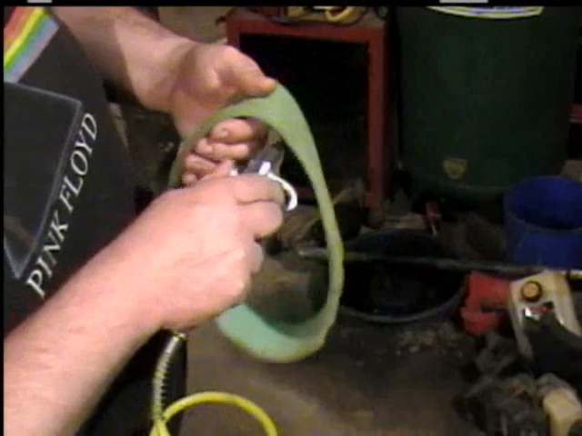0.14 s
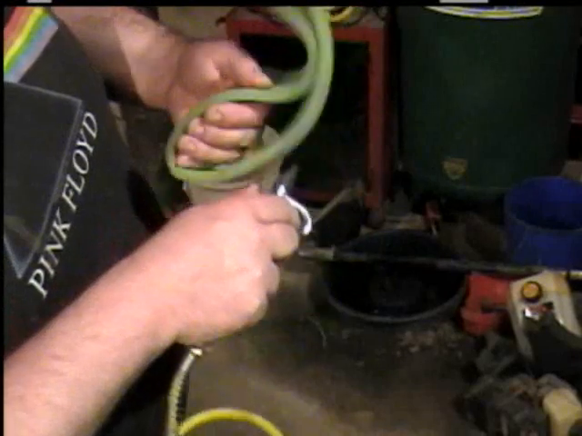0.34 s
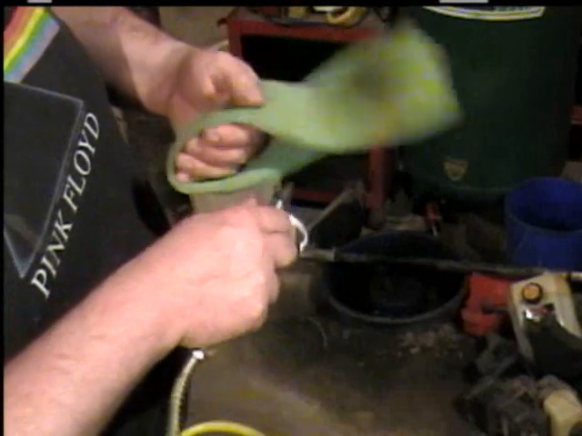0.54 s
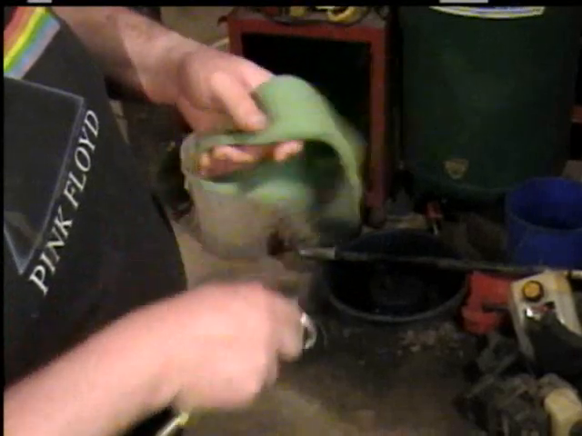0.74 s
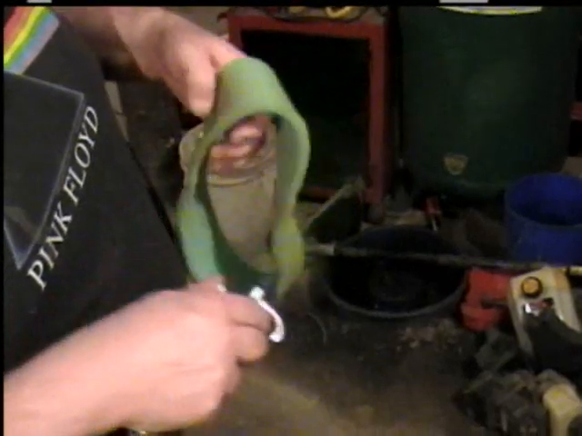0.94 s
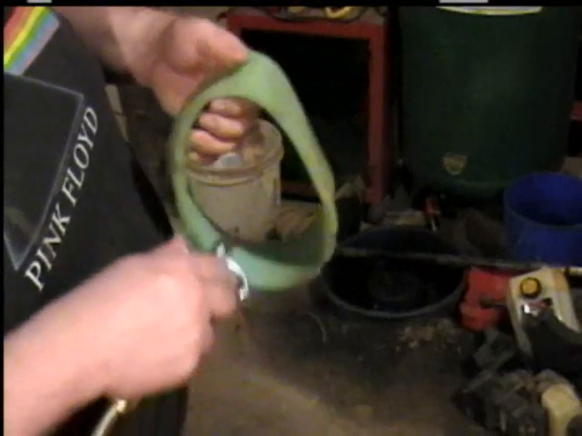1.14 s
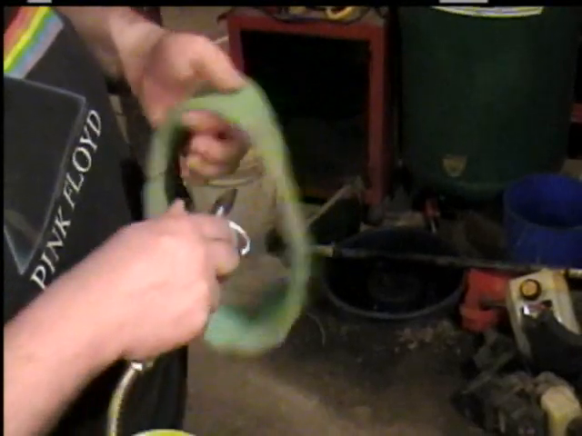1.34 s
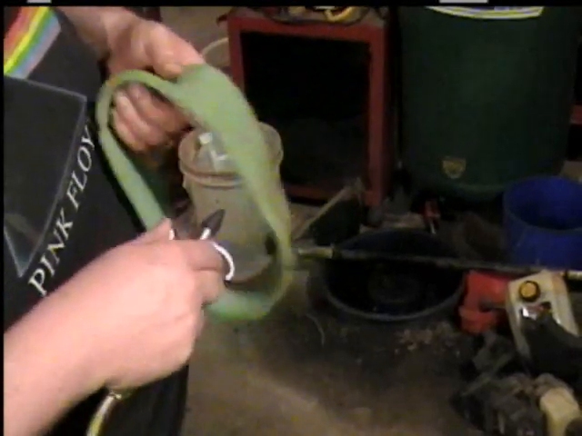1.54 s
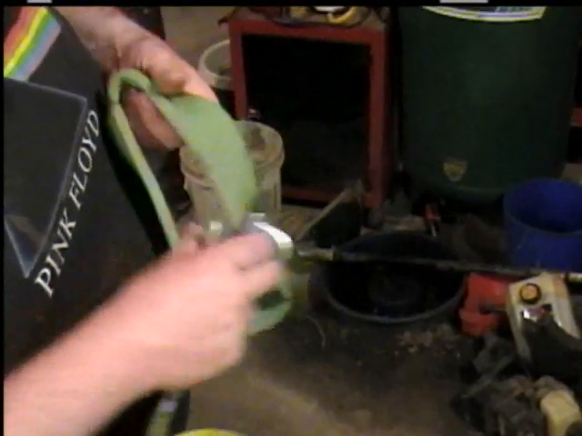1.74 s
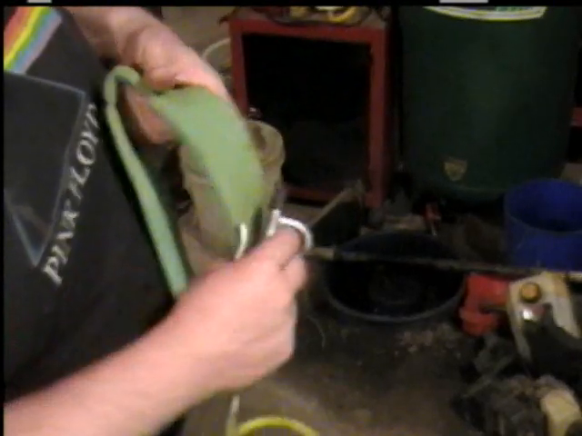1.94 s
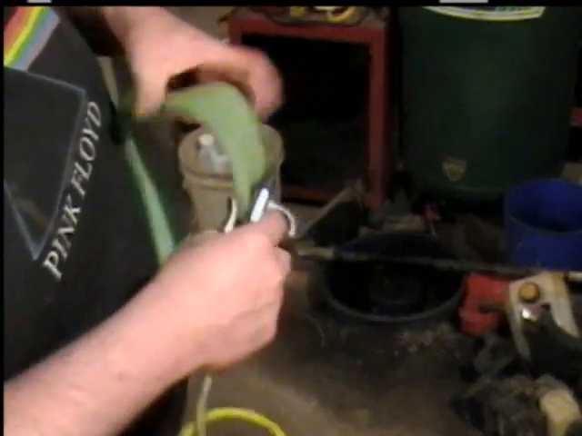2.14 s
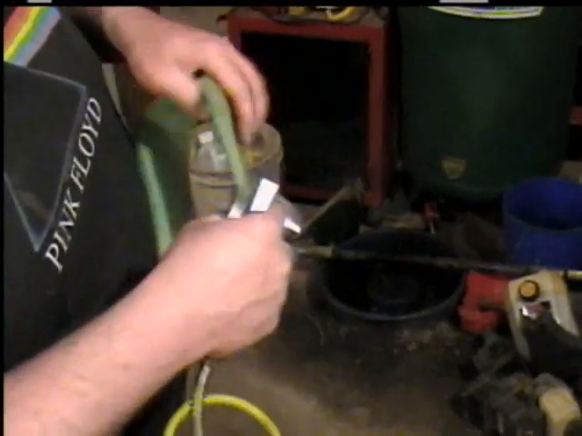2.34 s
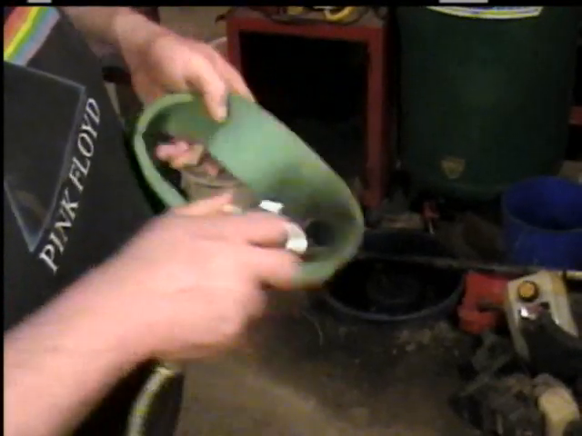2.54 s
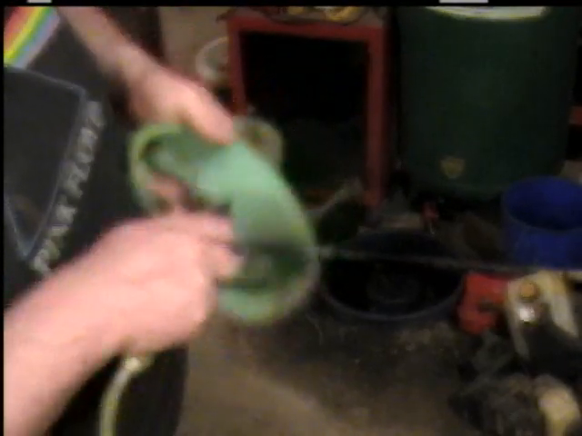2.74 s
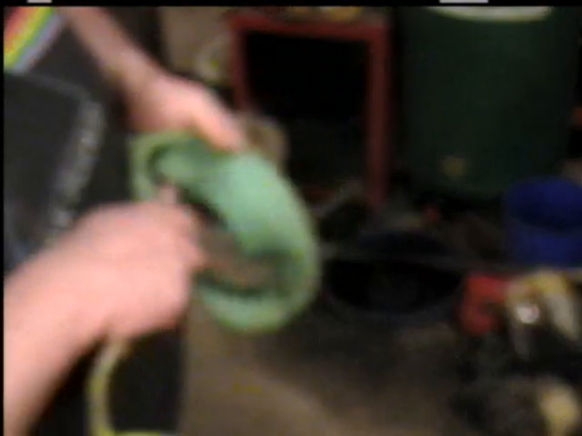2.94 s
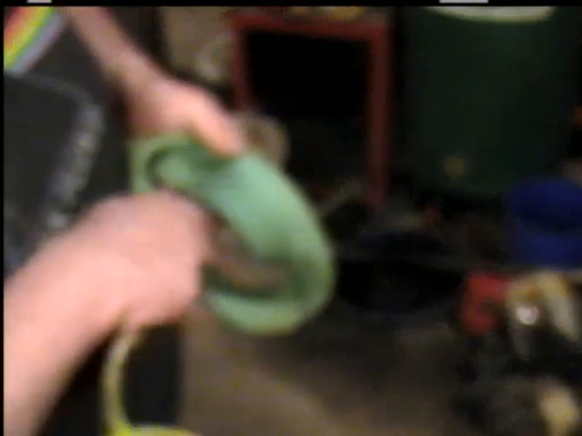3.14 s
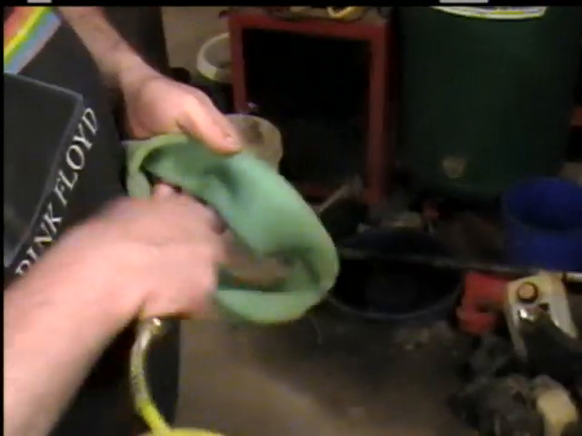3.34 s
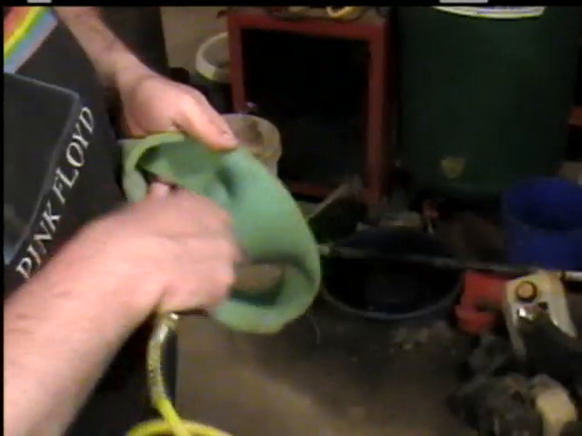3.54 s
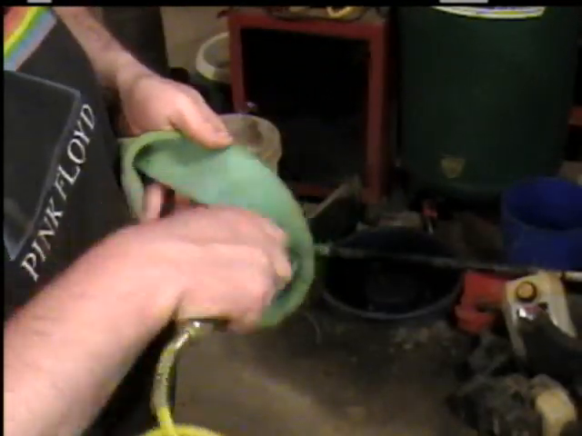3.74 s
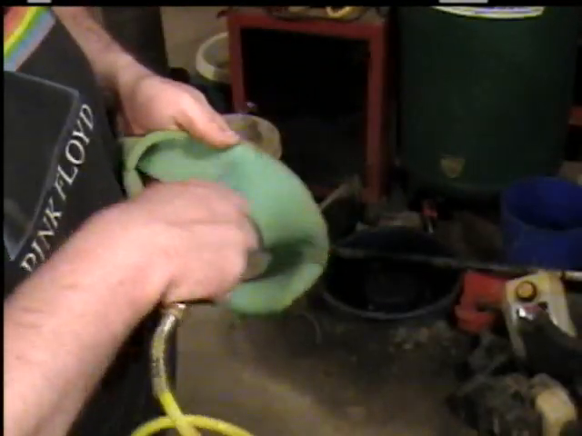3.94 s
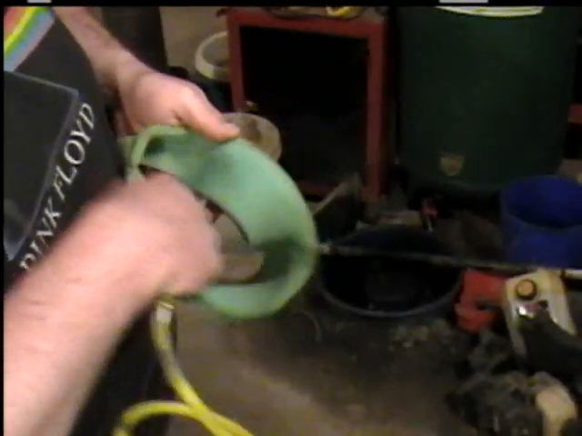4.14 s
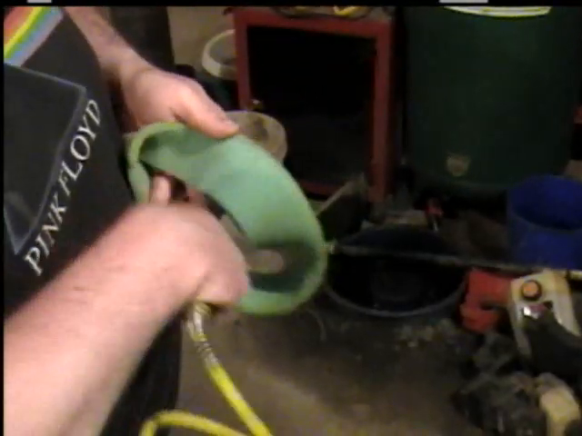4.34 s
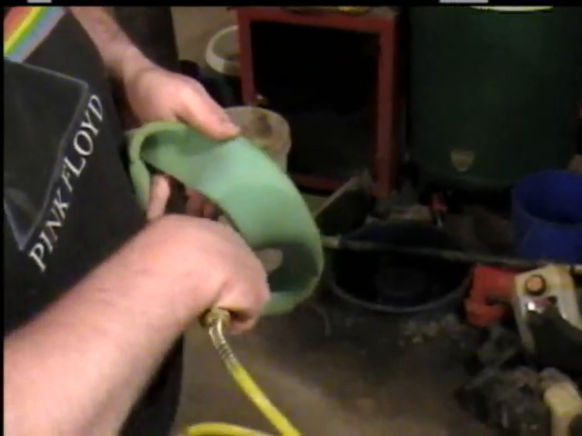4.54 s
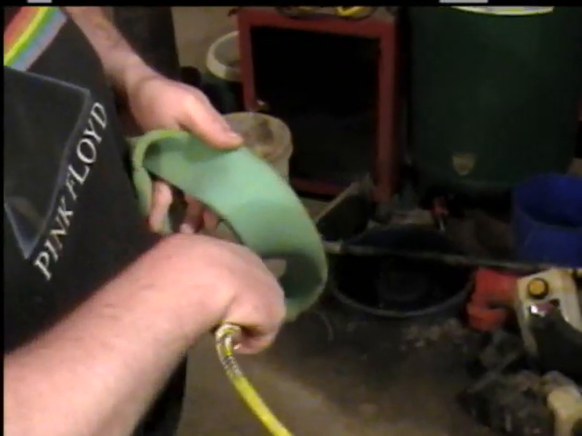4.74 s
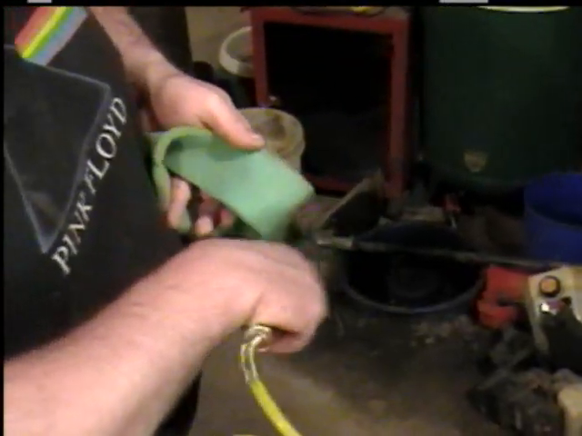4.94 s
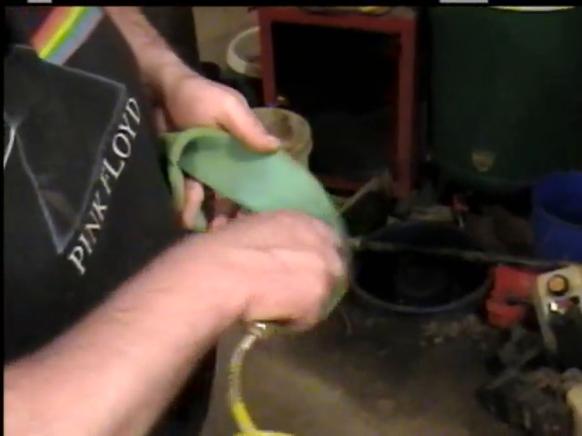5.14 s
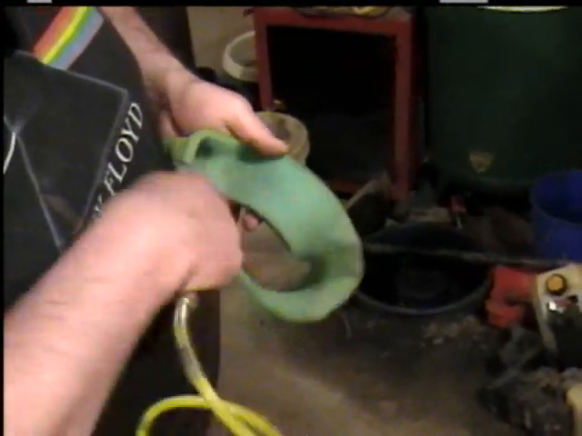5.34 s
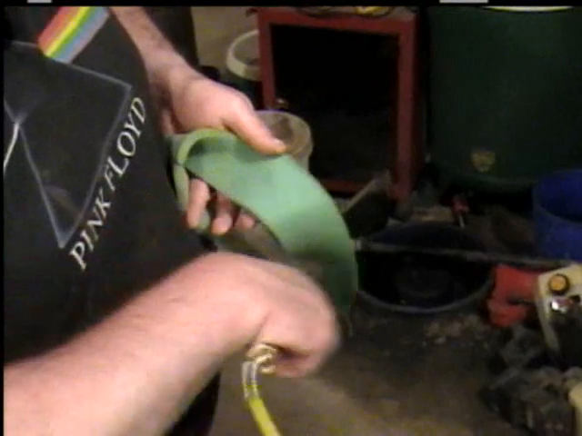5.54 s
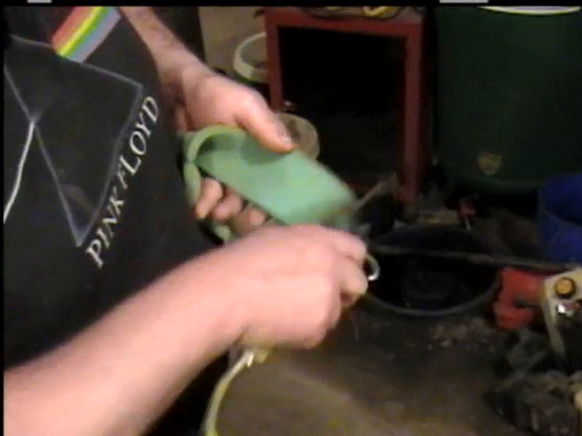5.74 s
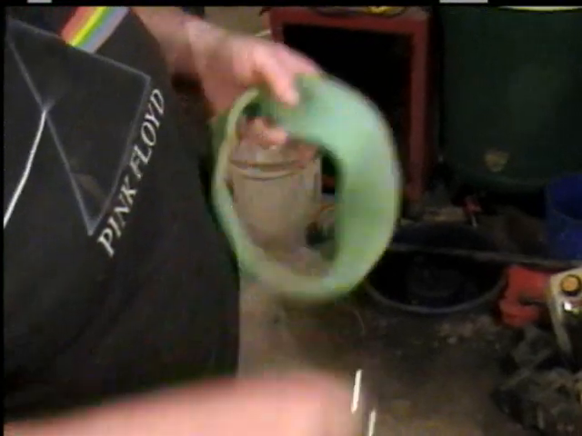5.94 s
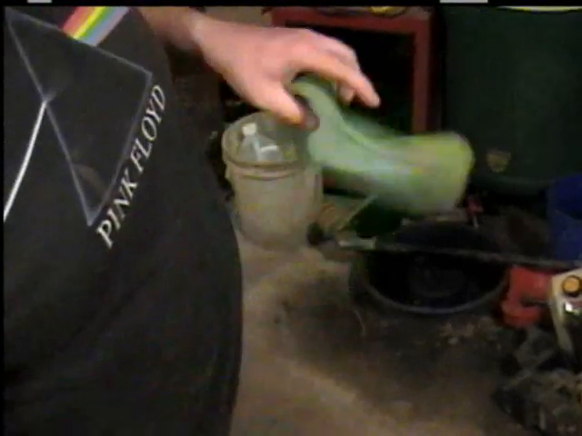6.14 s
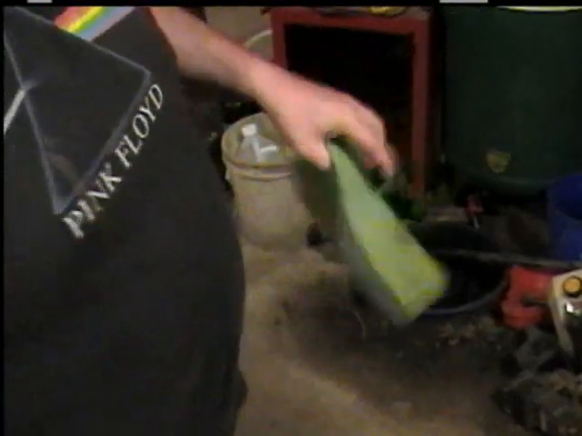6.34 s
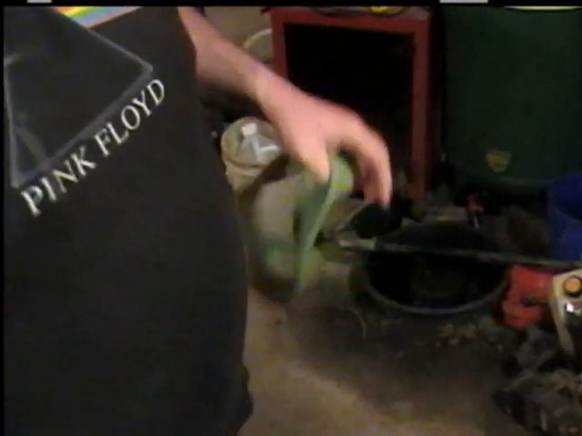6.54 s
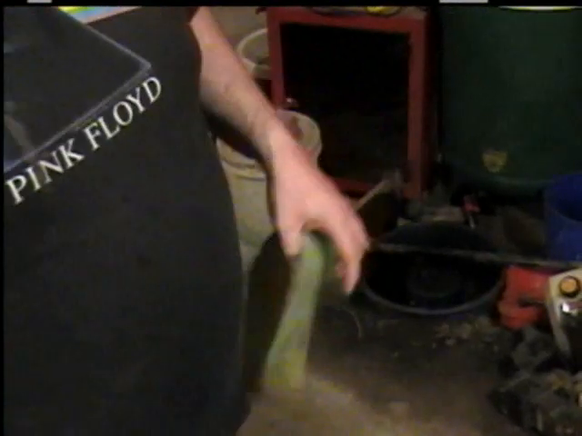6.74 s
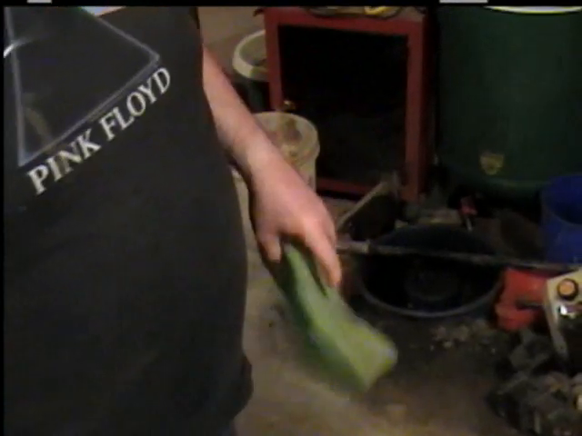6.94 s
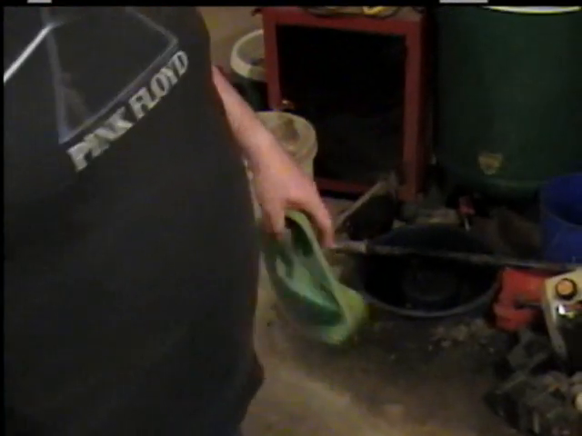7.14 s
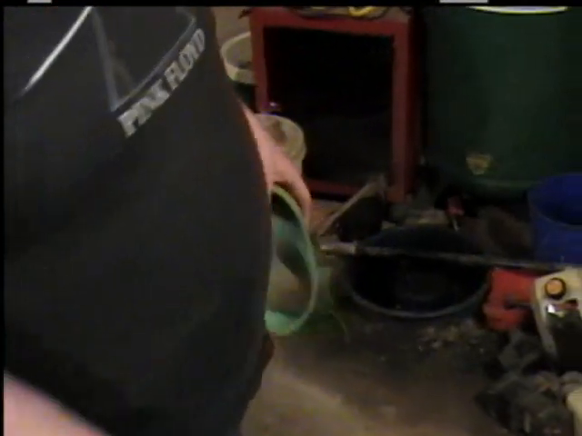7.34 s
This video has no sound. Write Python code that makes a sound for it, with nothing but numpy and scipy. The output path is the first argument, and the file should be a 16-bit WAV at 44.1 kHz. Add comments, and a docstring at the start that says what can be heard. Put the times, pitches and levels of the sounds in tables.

```python
"""Air blow gun drying a foam filter

In a small workshop a blow gun gives one short burst, then a long blast swept over wet foam. All air sounds are shaped noise.
The free jet hisses; where it bites the foam rasps, the cupped ring sounds hollow, and the loose band flutters and sputters.
Around the blasts the trigger leaks through ringing nozzle resonances and hands make short resonant bumps.
A tape camcorder close by adds steady hiss and drifting sine tones, and combs the sound at its head drum's rate."""
import sys
import numpy as np
from scipy import signal
from scipy.fft import rfft, irfft, next_fast_len
from scipy.io import wavfile
from scipy.ndimage import uniform_filter1d, map_coordinates

SR = 44100
rng = np.random.default_rng(int(sys.argv[2]) if len(sys.argv) > 2 else 0)


def wav_record(signal):
    """Record a signal, one row per channel, as 16-bit PCM in the file named by sys.argv[1]."""
    frames = np.transpose(np.atleast_2d(signal))
    bounded = np.clip(frames, -1, 1)
    # unit amplitude maps onto the largest positive 16-bit level
    quanta = np.round(bounded * 32767).astype(np.int16)
    wavfile.write(sys.argv[1], SR, quanta)


N = 325899

# left-right likeness of the air noise: freq_hz, correlation
AIR_LIKENESS = [(60, 0.22), (130, 0.64), (290, 0.31), (630, 1), (1380, 0.75), (3000, .9), (6600, 0.98),
                (11000, 0.67), (14600, 0.52)]
# the jet bites into the foam: start_s, length_s, more_rasp_db, more_hollow_db, mic_wind_db (relative)
FOAM_BITES = [(0.246, 0.051, 5, 3.5, -50), (0.607, 0.036, 3.5, 1.5, -65), (2.916, 0.043, 7, 9.5, -44),
              (2.959, 0.098, 4.5, 3.5, -56), (3.133, 0.18, 3.5, 2.5, -56), (3.38, 0.033, 3, 3.5, -53),
              (3.424, 0.095, 2.5, 6.5, -61), (3.612, 0.11, 3.5, 4.5, -62), (3.898, 0.073, 4.5, 2.5, -50),
              (4.065, 0.059, 4.5, 5, -50), (4.157, 0.11, 2.5, 2.5, -70), (4.275, .083, 3.5, 5.5, -70),
              (4.876, 0.077, 1, 3, -59), (5.138, 0.037, 3, 5, -64), (5.29, 0.12, 4, 5.5, -57),
              (5.433, 0.058, 2.5, 3, -54)]


def amp(db):
    """Decibels to gain."""
    return 10 ** (np.asarray(db) / 20)


def unit(x):
    """x at rms 1."""
    return x / np.sqrt(np.mean(x ** 2) + 1e-20)


def along(points, hz):
    """(Hz, value) points interpolated on a log frequency axis."""
    f, v = np.transpose(points)
    return np.interp(np.log(hz + 1), np.log(f + 1), v)


def wobble(rate_hz):
    """Smooth random curve through rate_hz normal knots a second."""
    knots = rng.standard_normal(int(N * rate_hz / SR) + 4)
    return map_coordinates(knots, [np.arange(N) * rate_hz / SR])


def filtered(x, response):
    """x times a complex response of frequency."""
    m = next_fast_len(N + SR // 2)
    spectrum = rfft(x, m) * response(np.fft.rfftfreq(m, 1 / SR))
    return irfft(spectrum, m)[..., :N]


def resonance(f, hz, width_hz):
    """Response of one damped resonance, 1 at its centre."""
    return 1j * f * width_hz / (hz * hz - f * f + 1j * f * width_hz)


def swell(start_s, length_s):
    """Quick rise to 1 at half the length, then a slower fall."""
    u = np.maximum(np.arange(N) / SR - start_s, 0) / (length_s / 2)
    return u * u * np.exp(2 - 2 * u)


def stroke(start_s, length_s, rise_s, fall_s):
    """Soft-edged gate, half open at its start and end."""
    t = np.arange(N) / SR - start_s
    opening = (1 + np.tanh(t / (2 * rise_s))) / 2
    closing = (1 + np.tanh((length_s - t) / (2 * fall_s))) / 2
    return opening * closing


def moves(rows):
    """Sum of (start_s, length_s, size) movements of the jet over the foam."""
    hand_s = 0.0066  # how quickly the moving jet takes hold and lets go
    return sum(size * stroke(start_s, length_s, hand_s, hand_s) for start_s, length_s, size in rows)


def rush(spectrum, alike, patchy_db):
    """Stereo noise of rms 1 with patches of random gain in time and frequency."""
    z = signal.stft(rng.standard_normal((2, N)), nperseg=512)[2]
    field = uniform_filter1d(rng.standard_normal(z.shape[1:]), size=4, axis=0)
    field = uniform_filter1d(field, size=16, axis=1)
    pair = signal.istft(z * amp(patchy_db * unit(field)), nperseg=512)[1][:, :N]

    def mid_side(hz):
        # this angle splits the power so that left and right correlate as the table says
        angle = np.arccos(np.clip(along(alike, hz), -1, 1)) / 2
        return amp(along(spectrum, hz)) * [np.cos(angle), np.sin(angle)]

    mid, side = filtered(pair, mid_side)
    return unit(np.array([mid + side, mid - side]))


def sputter(depth_db, rate_hz):
    """Uneven gain of mean power 1: water and foam break up the stream."""
    return unit(amp(depth_db * wobble(rate_hz)))


def background():
    """Steady hiss and the tape drive, whose close tones drift together and beat against each other."""
    # hiss spectrum: freq_hz, density_db_per_hz (relative)
    floor = [(20, -15), (55, -11), (120, -1), (220, -2), (330, -3), (480, -1), (700, -4.5), (1100, -6.5),
             (1700, -11), (2700, -7), (5000, -7.5), (9500, -7.5), (12000, -14), (15000, -31)]
    # hiss left-right likeness: freq_hz, correlation
    floor_likeness = [(60, 0.24), (240, 0.33), (930, 0.4), (3690, 0.97), (14600, 0.92)]
    # tape drive tones: freq_hz, rms_db (relative)
    tones = [(59.2, -83), (118.4, -69), (218, -69.5), (344.5, -79), (468, -64.5), (577, -65.5), (617, -69),
             (786, -62), (955, -76), (1070, -64.5), (1104.4, -59), (1123.5, -62.5), (1157.6, -63),
             (1421, -70.5), (1588, -82), (4710, -69), (9798, -66)]
    t = np.arange(N) / SR + 5e-5 * wobble(7.1)  # the drive runs slightly early and late
    whine = np.zeros(N)
    for hz, db in tones:
        whine += amp(db) * np.sqrt(2) * np.sin(2 * np.pi * (hz * t + rng.random()))
    hiss = amp(-47.0) * rush(floor, floor_likeness, patchy_db=1.7)
    return hiss + amp(-2.7) * whine


def handling():
    """Each soft contact is a short swell of noise in one broad resonance."""
    # hands, foam and gun brush and bump: start_s, level_db, centre_hz, width_hz, length_s
    contacts = [(1.098, -62, 500, 400, 0.055), (1.645, -53, 338, 70, 0.12), (1.975, -49.5, 453, 300, 0.022),
                (2.028, -52, 487, 200, 0.046), (2.19, -52, 580, 120, 0.052), (2.52, -58, 2000, 600, .03),
                (2.597, -48, 7700, 1100, 0.026), (2.67, -56, 480, 100, .07), (2.872, -45, 1400, 300, .035),
                (5.858, -44, 402, 200, 0.028), (6.066, -49, 530, 200, 0.06), (6.062, -53, 1400, 1210, 0.05),
                (6.598, -55, 240, 120, 0.05), (6.935, -47.5, 355, 141, 0.14),
                (7.23, -54.5, 2010, 450, 0.21), (7.32, -60, 390, 120, .08)]
    out = np.zeros(N)
    for start_s, db, hz, width_hz, length_s in contacts:
        rub = filtered(rng.standard_normal(N), lambda f: resonance(f, hz, width_hz) ** 2)
        out += amp(db) * swell(start_s, length_s) * unit(rub)
    return out


def leak():
    """A thread of air past the half-pressed trigger sings faintly in the nozzle's resonances."""
    # nozzle resonances: freq_hz, width_hz, gain_db
    nozzle = [(2600, 1100, -2.5), (3910, 140, 6.5), (5140, 1200, -6)]
    # air seeping past the trigger: start_s, length_s, level_db, fade_s
    leaks = [(0.8, 0.45, -47.5, .06), (1.645, 0.37, -50.5, .03), (2.887, 0.062, -38, .005),
             (5.78, 0.46, -49, 0.14)]
    seep_rise_s = 0.0099

    def ringing(f):
        # neighbouring resonances have opposite signs
        return sum((-1) ** k * amp(db) * resonance(f, hz, width_hz)
                   for k, (hz, width_hz, db) in enumerate(nozzle))

    air = unit(filtered(rng.standard_normal(N), ringing))
    seep = sum(amp(db) * stroke(start_s, length_s, seep_rise_s, fade_s)
               for start_s, length_s, db, fade_s in leaks)
    return air * seep


def puffs():
    """First slug of each blast, then air thrown back by each bite, thud low at the microphone ports."""
    # first slug from the opening valve: start_s, level_db, time_constant_s
    slugs = [(0.226, -41.5, 0.0023), (2.932, -23.5, 0.001)]
    # wind spectrum: freq_hz, density_db_per_hz (relative)
    buffet = [(15, 8), (40, 5), (100, -4.5), (180, -5), (260, -30), (500, -34)]
    slug = np.zeros(N)
    for start_s, db, tau_s in slugs:
        u = np.maximum(np.arange(N) / SR - start_s, 0) / tau_s
        slug += amp(db) * 2 * u * (2 - u) * np.exp(-u)  # a push, then a weaker suck
    stray = moves((start_s, length_s, amp(wind_db)) for start_s, length_s, _, _, wind_db in FOAM_BITES)
    wind = rush(buffet, AIR_LIKENESS, patchy_db=2.0) * sputter(depth_db=2.5, rate_hz=30)
    return slug + amp(5.0) * stray * wind


def airflow():
    """The valve cracks with a spit and opens, the flow holds, and after release the pressure drains away."""
    # trigger: press_s, release_s, valve_opening_s, spit_share (flow at once), drain_db_per_s
    blasts = [(0.222, 0.655, 0.017, 0.4, 138), (2.922, 5.671, .01, .1, 170)]
    t = np.arange(N) / SR
    flow = np.zeros(N)
    for press_s, release_s, opening_s, spit, drain_db_per_s in blasts:
        opening = np.clip((t - press_s) / opening_s, 0, 1) ** 2
        valve = (t > press_s) * (spit + (1 - spit) * opening)
        flow += valve * amp(-drain_db_per_s * np.maximum(t - release_s, 0))
    return flow


def drives():
    """Gains of jet, rasp, hollow and flutter: the airflow, shared out by where the nozzle points."""
    # slow drift of the aim, deep in the ring, then along its rim: time_s, free_jet_db, more_flutter_db
    aim = [(0.3, -19, 2), (0.43, -16.5, -1), (0.7, -17.5, 4.5), (2.97, -22, 0.5), (3.17, -24.5, 0.5),
           (3.3, -21.5, -10), (3.55, -20, -9.5), (3.95, -22.5, -2), (4.2, -19, -7.5), (4.38, -23, 3),
           (4.52, -18, 7.5), (4.8, -16.5, 5.5), (4.98, -19, 4), (5.08, -17, -2.5), (5.26, -17, 0.5),
           (5.42, -20.5, 1), (5.58, -21, 4.5), (5.68, -16.5, -0.5)]
    # the jet crosses a foam edge and the hiss flares: start_s, length_s, more_hiss_db
    edges = [(0.23, .025, 8.5), (2.922, 0.031, 6), (3.08, 0.093, 6.5), (3.364, 0.04, 7),
             (3.592, 0.026, 7.5), (3.835, .095, 6), (4.07, 0.1, 1.5)]
    # the nozzle sinks into the foam and is muffled: start_s, length_s, loss_db
    smothers = [(3.305, 0.049, 8), (3.545, .042, 8), (3.738, 0.08, 4), (4.0, 0.033, 1), (4.388, 0.097, 5.5),
                (5.502, 0.075, 5)]
    # the loose band flaps in the stream: start_s, length_s, more_flutter_db
    flap_bursts = [(0.268, 0.068, 8.5), (3.832, 0.033, 7), (4.015, 0.072, 8), (4.25, 0.058, 11),
                   (4.338, 0.072, 8), (4.868, 0.095, 8.5), (5.29, 0.046, 7.5), (5.448, 0.046, 12.5),
                   (5.578, 0.05, 12)]
    # the jet slips past, leaving mostly hiss: start_s, length_s, rasp_and_hollow_loss_db
    misses = [(5.2, 0.079, 1), (5.632, 0.15, 3)]
    rasp_db, cup_db, flutter_db = -17, -27, -40  # the foam's layers under a resting jet
    # how much of the muffling reaches each other layer
    jet_muffle_share, hollow_muffle_share, flutter_muffle_share = 0.42, 0.71, 0.3
    flap_hollow_share = 0.4  # flutter also drives the hollow of the ring
    hollow_flow_power = 1.18  # the hollow needs the most pressure: it comes last and dies first

    time_s, *columns = np.transpose(aim)
    aim_jet_db, loose_db = (np.interp(np.arange(N) / SR, time_s, column) for column in columns)
    flow = airflow()
    muffle = moves(smothers)
    miss = moves(misses)
    flaps = loose_db + moves(flap_bursts)
    bite = moves((start_s, length_s, rasp) for start_s, length_s, rasp, _, _ in FOAM_BITES)
    boom = moves((start_s, length_s, cup) for start_s, length_s, _, cup, _ in FOAM_BITES)

    jet = flow * amp(aim_jet_db + moves(edges) - jet_muffle_share * muffle)
    foam = flow * amp(rasp_db + bite - muffle - miss)
    hollow_db = cup_db + boom + flap_hollow_share * flaps - hollow_muffle_share * muffle - miss
    hollow = flow ** hollow_flow_power * amp(hollow_db)
    flutter = flow * amp(flutter_db + flaps - flutter_muffle_share * muffle)
    return jet, foam, hollow, flutter


def blow_gun():
    """Jet noise, plus the rasp, hollow and flutter of the foam that it hits."""
    # noise spectra, each: freq_hz, density_db_per_hz (relative)
    jet_spectrum = [(500, -51), (2000, -8), (4000, -4.5), (6000, -0.5), (7500, 1), (8500, -1), (9700, -1),
                    (10500, -2), (11300, -3.5), (12200, -7), (13200, -10), (14200, -53), (15200, -57)]
    foam_spectrum = [(900, -38.5), (2200, -16), (2750, -1), (3200, -1), (3800, 0), (4450, -0.5), (5200, -2),
                     (6300, -4.5), (8000, -39), (13000, -55)]
    # the dent that the jet presses into the foam, same columns
    bite_spectrum = [(2500, -56), (3500, -18), (3950, 2.5), (4380, 5.5), (4700, 1.5), (5600, -24),
                     (8000, -35)]
    # the cupped ring, same columns
    hollow_spectrum = [(400, -34), (800, -9.5), (1050, -4), (1300, 3.5), (1600, 4), (1950, 5), (2500, 1.5),
                       (4000, -51)]
    # the loose band, same columns
    flutter_spectrum = [(100, -32), (250, -2.5), (450, -2.5), (650, 4), (850, 6.5), (1200, -2), (2200, -50)]
    # the whole band thrumming, same columns
    thrum_spectrum = [(80, -37), (140, -5), (200, 1), (360, 4), (520, 7), (900, -29)]

    jet, foam, hollow, flutter = drives()
    hiss = amp(1.85) * jet * rush(jet_spectrum, AIR_LIKENESS, patchy_db=1.66)

    # the more of the jet the foam takes, the more the dent under the nozzle resonates
    contact = foam ** 2 / (foam ** 2 + jet ** 2 + 1e-20)
    dent = amp(-1.0) * contact ** 4 * rush(bite_spectrum, AIR_LIKENESS, patchy_db=-0.5)
    scrape = amp(-1.0) * rush(foam_spectrum, AIR_LIKENESS, patchy_db=1.88)
    rasp = foam * (scrape + dent) * sputter(depth_db=0.92, rate_hz=280)

    cup = amp(-0.64) * hollow * rush(hollow_spectrum, AIR_LIKENESS, patchy_db=2.0)
    cup = cup * sputter(depth_db=0.54, rate_hz=140)

    # a jet that only grazes the edge sets the whole band of foam thrumming
    thrum = amp(-0.2) * (1 - contact) ** 1.29 * rush(thrum_spectrum, AIR_LIKENESS, patchy_db=2.0)
    loose = amp(-0.6) * rush(flutter_spectrum, AIR_LIKENESS, patchy_db=0.56)
    flap = flutter * (loose + thrum) * sputter(depth_db=1.45, rate_hz=60)
    return (hiss + rasp + cup + flap) * sputter(depth_db=0.62, rate_hz=70)


def workshop(x):
    """The cluttered room's reverb: decaying noise in which the treble dies first."""
    # reverberation time: freq_hz, t60_s
    t60 = [(200, 0.36), (2000, 0.18), (5000, 0.15), (12000, 0.15)]
    hz, t, z = signal.stft(rng.standard_normal((2, SR // 2)), SR, nperseg=256)
    decay = amp(-60 * t / along(t60, hz)[:, None])
    late = t > 0.008  # s: the floor's first echo is back
    tail = signal.istft(z * decay * late, SR, nperseg=256)[1]
    return signal.fftconvolve(x, tail / np.linalg.norm(tail[0]), axes=1)[:, :N]


def ports(x):
    """Level and phase differ between the two microphones; the low end leans right."""
    # level difference: freq_hz, left_minus_right_db
    tilt = [(60, -7), (110, -1), (200, -5), (370, -7.5), (690, -9), (1270, -5.5), (2340, -4), (4300, -1.0),
            (7910, 2), (14600, -1)]
    # phase difference: freq_hz, left_lead_rad
    lead = [(100, -0.19), (1000, 0.31), (2760, 0.38), (7000, 0.12), (9000, 0.17), (11000, -0.62),
            (14000, -0.46)]

    def pair(hz):
        sides = np.array([[0.5], [-0.5]])
        gain = amp(sides * along(tilt, hz))
        return gain / gain.mean(axis=0) * np.exp(1j * sides * along(lead, hz))

    return filtered(x, pair)


def scene():
    """Gun and hands in the room, with the puffs at the microphones and the steady background."""
    near = blow_gun() + leak() + handling()
    return ports(near + amp(-10) * workshop(near) + puffs() + background())


def drum_notches(x, depth, narrow):
    """Comb filter that dips at every multiple of the head drum's speed."""
    drum_hz = 149.65

    def comb(hz):
        turn_ago = np.exp(-2j * np.pi * hz / drum_hz)
        return (1 - depth * turn_ago) / (1 - narrow * turn_ago)

    return filtered(x, comb)


def record(dry):
    """The camcorder combs the sound, rounds off the highest peaks and limits the band."""
    top_hz, ceiling = 15100, 0.98
    x = amp(0.01) * drum_notches(dry, depth=0.84, narrow=0.37)
    x = x / (1 + np.abs(x / ceiling) ** 8) ** (1 / 8)
    return filtered(x, lambda hz: hz < top_hz)


dry = scene()
out = record(dry)
wav_record(out)
```